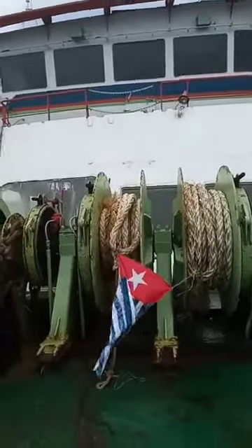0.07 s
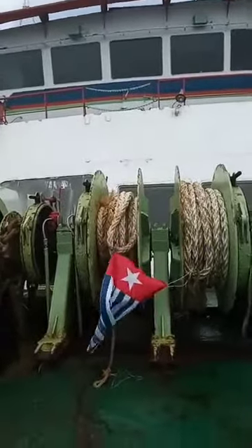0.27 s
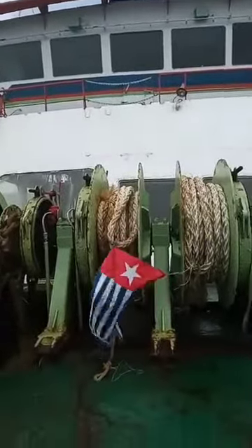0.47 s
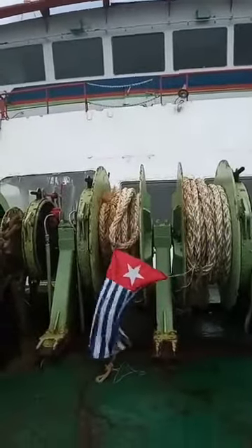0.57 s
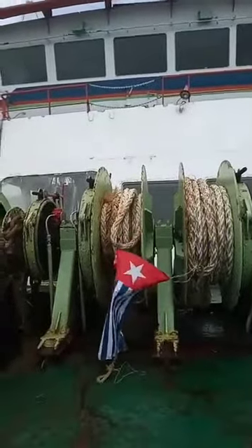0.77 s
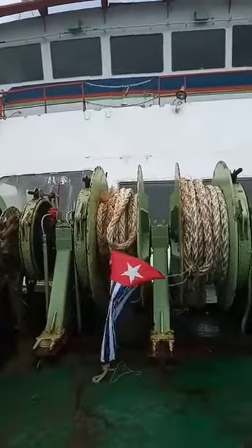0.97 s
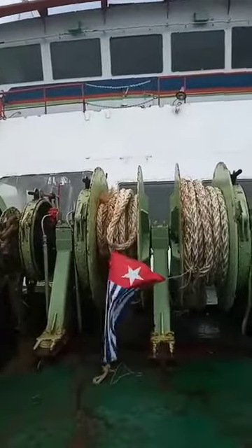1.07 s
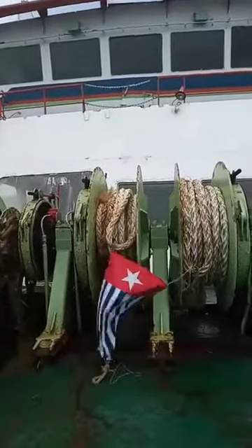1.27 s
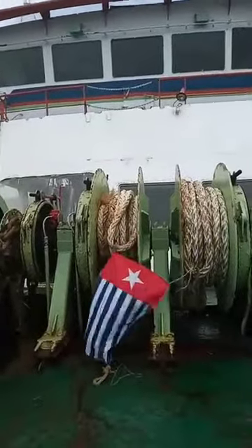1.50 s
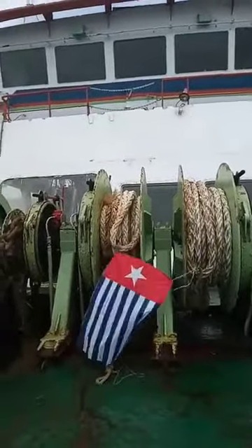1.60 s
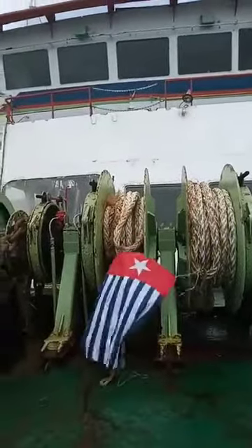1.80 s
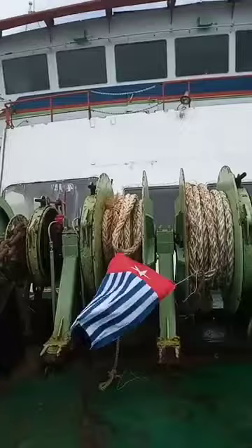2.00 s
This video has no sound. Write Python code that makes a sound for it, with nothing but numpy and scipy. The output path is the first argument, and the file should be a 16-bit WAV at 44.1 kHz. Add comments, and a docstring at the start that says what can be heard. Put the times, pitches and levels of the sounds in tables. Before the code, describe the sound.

Strong wind batters a small microphone on an open ship deck, with rapid roaring gusts, low thumps, hiss and crackling pops, softly distorted throughout; a faint steady ship rumble lies beneath and a flag snaps occasionally.

```python
"""Strong wind on an open ship deck tears across a small microphone port.
From the start, gusts of coloured noise hiss, roar and howl at a wandering pitch, with sharp pressure pops;
slow eddies thump as resonated noise, over a steady low rumble of the ship and a faint flickering top.
Brief tonal puffs soon join, and from 0.78 s a flag snaps now and then in bursts of bright noise.
The microphone overloads softly throughout, by a saturating curve."""
import sys
import numpy as np
from scipy import signal
from scipy.io import wavfile
from scipy.ndimage import uniform_filter1d

SR = 44100
rng = np.random.default_rng(int(sys.argv[2]) if len(sys.argv) > 2 else 0)


def unload_audio(sound):
    """Save the sound as a 16-bit wav file, at the path given as the first command line argument."""
    columns = np.transpose(np.atleast_2d(sound))
    # keep every value between -1 and 1, then stretch to whole-number steps
    steps = np.round(np.clip(columns, -1, 1) * 32767)
    wavfile.write(sys.argv[1], SR, steps.astype(np.int16))


N = 90404

# Gusts on the port. Each row: time in seconds, level of the lower hiss in dB,
# level of the upper hiss in dB, level of the roar in dB.
GUSTS = [(0.0, -39, -40, -12), (0.01, -59, -67, -41.5), (0.02, -32, -50, -24.5), (0.06, -35.5, -40, -20.5),
         (0.12, -53, -64, -38.5), (0.18, -27.5, -40.5, -21.5), (0.19, -50.5, -62, -29),
         (0.22, -28, -33, -21), (0.27, -41, -62, -20), (0.29, -31, -28.5, -25.5), (0.31, -56.5, -63, -38.5),
         (0.35, -38, -45.5, -22.5), (0.39, -46.5, -61.5, -33.5), (0.44, -41, -49, -18),
         (0.46, -54.5, -67, -35), (0.48, -34.5, -43.5, -27.5), (0.54, -31, -37, -21.5),
         (0.56, -45, -53.5, -30), (0.63, -45, -52.5, -24), (0.64, -58, -67, -40), (0.67, -28.5, -27, -31),
         (0.69, -56, -64, -36.5), (0.72, -22, -28, -21.5), (0.76, -34.5, -44.5, -25.5),
         (0.78, -20, -25.5, -25), (0.79, -28, -34.5, -19.5), (0.86, -27, -31.5, -19),
         (0.88, -40, -47.5, -25.5), (0.91, -29, -38, -22.5), (1.01, -42.5, -50.5, -27),
         (1.04, -53.5, -63.5, -34), (1.11, -39.5, -42.5, -29.5), (1.24, -34, -41, -27),
         (1.25, -41.5, -55, -43.5), (1.28, -29.5, -35, -19.5), (1.31, -49, -64, -35),
         (1.34, -41.5, -49.5, -22.5), (1.37, -28.5, -37, -21.5), (1.42, -47, -52, -21.5),
         (1.43, -43, -40, -27.5), (1.46, -46.5, -64, -35.5), (1.48, -32, -31.5, -30),
         (1.5, -32, -38, -19.5), (1.53, -49, -63, -33), (1.56, -46.5, -48.5, -22.5),
         (1.63, -30.5, -51, -25), (1.64, -49.5, -61, -40.5), (1.68, -39.5, -50, -30),
         (1.69, -50, -47.5, -26.5), (1.74, -36.5, -46.5, -22), (1.81, -43.5, -54, -26.5),
         (1.84, -30.5, -37, -24.5), (1.85, -33, -42, -33.5), (1.89, -33.5, -33.5, -27.5),
         (1.92, -44.5, -54, -34.5), (1.94, -27, -40.5, -23), (1.96, -27, -34, -16),
         (1.98, -53.5, -55.5, -30), (2.03, -33.5, -46, -24), (2.05, -47, -71, -34)]
# Wandering pitch of the howl. Each row: time in seconds, centre frequency in Hz.
HOWL_PITCH = [(0.0, 1226), (0.1, 1240), (0.14, 740), (0.24, 880), (0.3, 1240), (0.46, 1364), (0.53, 706),
              (0.66, 816), (0.87, 694), (0.92, 955), (1.04, 710), (1.26, 804), (1.38, 684), (1.44, 950),
              (1.5, 556), (1.6, 666), (1.68, 1255), (1.74, 1252), (1.78, 794), (1.9, 520), (2.0, 693),
              (2.05, 1360)]
# Large eddies. Each row: time in seconds, level of the thumps in dB, their centre frequency in Hz,
# level of the low roar in dB.
EDDIES = [(0.0, -28, 142.5, -27), (0.12, -25.5, 235, -25), (0.16, -27.5, 269, -25), (0.31, -22, 123.5, -33),
          (0.35, -17, 144.6, -26.5), (0.47, -26.5, 171, -26.5), (0.51, -17, 205, -24.5),
          (0.58, -16.5, 243.6, -23.5), (0.63, -28, 150, -27), (0.65, -16, 206, -38), (0.75, -34, 172, -19),
          (0.78, -33, 119.7, -24), (0.82, -27, 205, -14), (0.85, -14.5, 234.6, -18.5),
          (0.89, -25, 151.6, -21.5), (0.95, -20, 149.4, -18.5), (1.02, -16.5, 190.4, -42),
          (1.06, -28.5, 183, -21), (1.12, -15.5, 148, -28), (1.32, -24, 150.4, -23.5),
          (1.36, -20, 225, -27.5), (1.39, -20, 249, -20), (1.42, -31, 104.6, -27),
          (1.45, -16.5, 116.6, -30), (1.5, -23.5, 161, -25), (1.54, -24, 100.6, -24),
          (1.6, -18.5, 202, -22.5), (1.64, -17, 204, -33.5), (1.65, -22, 185, -24), (1.69, -17, 134, -28),
          (1.8, -28.5, 118.4, -24), (1.85, -19, 180, -28), (1.88, -37, 177, -15.5), (1.91, -24, 118, -23.5),
          (1.96, -18.5, 213, -30), (2.05, -20, 216, -21)]
# Level of the faint top. Each row: time in seconds, level in dB before flicker.
AIR_LEVEL = [(0.0, -69), (0.02, -66), (0.03, -54.5), (0.06, -75), (0.22, -73), (0.28, -87), (0.29, -67),
             (0.46, -88), (0.51, -60.5), (0.53, -85), (0.66, -87), (0.66, -65), (0.7, -80), (0.72, -62),
             (0.77, -86), (0.77, -64), (0.87, -56), (0.88, -76.5), (1.44, -71.5), (1.8, -83), (1.84, -70.5),
             (2.0, -79)]
# Short tonal puffs, from deep thuds to whistles. Each row: centre in seconds, peak level in dB,
# pitch in Hz, length in seconds between the points where the swell has fallen to exp(-2).
PUFFS = [(0.055, -23, 1648, .02), (0.157, -21.5, 702, 0.05), (0.165, -23, 1274, 0.044),
         (0.2, -19.5, 1250, 0.0087), (0.358, -24, 1200, 0.02), (0.451, -19, 1340, 0.0054),
         (0.467, -21, 425, 0.1), (0.59, -19.5, 804, 0.0068), (1.261, -23, 1135, 0.014),
         (1.342, -23.5, 1716, 0.031), (1.692, -40, 1300, .012), (1.806, -24, 765, 0.046),
         (1.95, -25.5, 1920, 0.022), (2.012, -22, 1277, 0.0091), (0.03, -18.5, 696, 0.012),
         (0.142, -22, 325, 0.036), (0.055, -23, 79, 0.047), (0.305, -18.5, 102, 0.059),
         (0.705, -25, 77, 0.056), (0.788, -19, 93, 0.043), (0.952, -18, 94.6, .07),
         (1.269, -20, 85.6, 0.035), (1.43, -22, 94.2, 0.076), (1.552, -19.5, 74.5, 0.057),
         (1.715, -24.5, 106, 0.045), (1.909, -23, 78, .05)]
# Snaps of the flag's cloth. Each row: centre in seconds, peak level in dB.
SNAPS = [(0.777, -22), (0.834, -32), (1.113, -28), (1.63, -26), (1.947, -30.5)]

# Spectral shapes of the noises. Each row: frequency in Hz, relative density in dB per Hz.
HISS_SPECTRUM = [(1290, -33), (2200, -7.5), (4900, -19.5), (6370, -29), (10800, -120)]
UPPER_HISS_SPECTRUM = [(2760, -61), (4700, -5.5), (6300, -1.5), (7100, -0.5), (7400, -3), (8130, -17.5),
                       (10600, -29), (17900, -120)]
ROAR_SPECTRUM = [(380, -23.5), (650, -2.5), (970, -6.5), (1270, -5.5), (1680, -7.5), (2600, -28.5),
                 (3380, -33.5), (5720, -120)]
THUMP_SPECTRUM = [(15, -49), (25, -45), (98, 2.5), (227, -3.5), (300, -3.5), (390, -24.5), (660, -120)]
LOW_ROAR_SPECTRUM = [(150, -23), (260, 0.5), (290, -0.5), (508, -2.5), (750, -14.5), (980, -37),
                     (1650, -120)]
RUMBLE_SPECTRUM = [(30, -28.5), (60, 4), (100, 19.5), (200, -13.5), (500, -18), (2000, -49), (8000, -65.5),
                   (8400, -97.5)]
AIR_SPECTRUM = [(8000, -25.5), (8400, 3), (10000, -3.5), (14800, -6.5), (15700, -24), (16500, -60.5)]

RUMBLE_DB = -35.5
HOWL_DB, HOWL_WIDTH_HZ = -5.5, 97  # level against the plain roar; width of each smoothing
EDDY_DB, EDDY_WIDTH_HZ = 0, 40.5  # level of the swing against the plain thump noise
# dB of level per unit of flicker
HISS_FLICKER_DB, ROAR_FLICKER_DB, LOW_FLICKER_DB, THUMP_FLICKER_DB, AIR_FLICKER_DB = 4.5, 4, 1, 2.04, 4.1
FLICKER_S = 0.0015
# depth of the wide patches, before the limit on lumps
HISS_PATCH_DB, ROAR_PATCH_DB, LOW_PATCH_DB = 0, 5.5, 2.5
SPECK_DB, SPECK_S, SPECK_HZ = 4, 0.0054, 39.4  # narrow, short, whistly specks
LUMP_LIMIT_DB = 7  # patches and specks never stand out more than this
STEADINESS = 0.56  # how far a noise holds its strength instead of wandering (0-1)
POPS_PER_S, POP_DB, POP_SPREAD_DB, POP_S = 200, -9.5, 6, 0.00011  # POP_DB is against the roar
PUFF_WIDTH_HZ = 51  # at 1 kHz, narrower for deeper puffs
SNAP_S, SNAP_LOW_HZ = 0.0013, 1500
CEILING = 0.7  # amplitude at which the overload saturates
BAND_HZ, EDGE_HZ = 8020, 15800  # cut-off of the wind; final cut-off


def gain_of(db):
    """Level principle: 20 dB is a tenfold amplitude."""
    return 10 ** (np.asarray(db) / 20)


def evened(x):
    """Power normalisation: scales a signal to unit root-mean-square."""
    return x / np.sqrt(np.mean(x ** 2) + 1e-20)


def curves(table):
    """Linear interpolation: joins each column of a table by straight lines in time."""
    rows = np.transpose(table)
    return [np.interp(np.arange(N) / SR, rows[0], column) for column in rows[1:]]


def bell(width):
    """Gaussian smoothing: a bell with a standard deviation of width samples."""
    steps = np.arange(-int(3 * width) - 1, int(3 * width) + 2)
    return np.exp(-0.5 * (steps / width) ** 2)


def patchwork(frames, size, patch_s, patch_hz):
    """Correlated randomness: white noise smoothed into hills over frequency and time."""
    hill = np.outer(bell(patch_hz * size / SR), bell(patch_s * SR * 4 / size))
    grid = rng.standard_normal((frames, size // 2 + 1)).T
    return evened(signal.fftconvolve(grid, hill, "same"))


def noise(spectrum, patch_db, size, patch_s, patch_hz, speck_db=SPECK_DB):
    """Spectral shaping: random Fourier frames coloured, with drifting wide patches and narrow specks."""
    hop = size // 4
    frames, hz = N // hop + 5, np.fft.rfftfreq(size, 1 / SR)
    real, imaginary = rng.standard_normal((frames, len(hz), 2)).T
    patches_db = patch_db * patchwork(frames, size, patch_s, patch_hz)
    specks_db = speck_db * patchwork(frames, size, SPECK_S, SPECK_HZ)
    lumps_db = LUMP_LIMIT_DB * np.tanh((patches_db + specks_db) / LUMP_LIMIT_DB)
    f, db = np.transpose(spectrum)
    # straight lines over log frequency
    colour_db = np.interp(np.log(hz + 1), np.log(f + 1), db, left=-120, right=-120)[:, None]
    bins = (real + 1j * imaginary) * gain_of(colour_db + lumps_db)
    return evened(signal.istft(bins, nperseg=size, noverlap=size - hop)[1][:N])


def resonate(x, hz, width_hz):
    """Moving resonance by heterodyning: shift down to zero, smooth twice, shift back."""
    turn = np.exp(2j * np.pi * np.cumsum(hz) / SR)
    pole = np.exp(-np.pi * width_hz / SR)
    smoothed = signal.lfilter([1], np.convolve([1, -pole], [1, -pole]), x / turn)
    return evened((turn * smoothed).real)


def blend(plain, tone, tone_db):
    """Superposition: adds a tone at a level relative to the plain noise."""
    return evened(plain + gain_of(tone_db) * tone)


def steadied(x, smooth_s):
    """Envelope compression: dividing by a power of the local power evens out chance swells."""
    power = signal.fftconvolve(x ** 2, bell(smooth_s * SR), "same")
    relative_power = abs(power) / np.mean(power)
    return evened(x / (relative_power + 0.023) ** (STEADINESS / 2))


def quick_flicker():
    """Band-limited modulation: smoothed noise less its slow part, softly bounded."""
    flicker = evened(signal.fftconvolve(rng.standard_normal(N), bell(FLICKER_S * SR), "same"))
    slow = signal.fftconvolve(flicker, bell(0.0087 * SR), "same") / bell(0.014 * SR).sum()
    flicker = evened(flicker - 0.33 * slow)
    return 2.04 * np.tanh(flicker / 1.9)


def gusts(flicker):
    """Turbulence noise: air tearing over the port hisses and roars, with a fuzzy resonant howl."""
    hiss_db, upper_db, roar_db = curves(GUSTS)
    hiss = noise(HISS_SPECTRUM, HISS_PATCH_DB, size=1024, patch_s=0.033, patch_hz=400)
    upper = noise(UPPER_HISS_SPECTRUM, HISS_PATCH_DB, size=1024, patch_s=0.016, patch_hz=400)
    both_hisses = gain_of(hiss_db) * hiss + gain_of(upper_db) * upper

    howl = resonate(rng.standard_normal(N), curves(HOWL_PITCH)[0], HOWL_WIDTH_HZ)
    plain_roar = noise(ROAR_SPECTRUM, ROAR_PATCH_DB, size=1024, patch_s=0.015, patch_hz=211)
    roar = gain_of(roar_db) * steadied(blend(plain_roar, howl, HOWL_DB), 0.0064)

    hiss_flicker = evened(gain_of(HISS_FLICKER_DB * flicker))
    roar_flicker = evened(gain_of(ROAR_FLICKER_DB * flicker))
    return both_hisses * hiss_flicker + roar * roar_flicker


def eddies(flicker):
    """Large-scale turbulence: lumpy low pressure swings about a moving centre, with a low roar."""
    thump_db, centre_hz, low_db = curves(EDDIES)
    swing = steadied(resonate(rng.standard_normal(N), centre_hz, EDDY_WIDTH_HZ), 0.0096)
    plain_thump = noise(THUMP_SPECTRUM, LOW_PATCH_DB, size=2048, patch_s=0.0098, patch_hz=38.3, speck_db=-0.3)
    thump = steadied(blend(plain_thump, swing, EDDY_DB), 0.017)
    low_roar = noise(LOW_ROAR_SPECTRUM, LOW_PATCH_DB, size=1024, patch_s=0.03, patch_hz=74, speck_db=5.0)
    thump_gain = gain_of(thump_db + THUMP_FLICKER_DB * flicker)
    low_gain = gain_of(low_db + LOW_FLICKER_DB * flicker)
    return thump_gain * thump + low_gain * low_roar


def ship():
    """Stationary noise: a low rumble at a constant level."""
    return gain_of(RUMBLE_DB) * noise(RUMBLE_SPECTRUM, 1.2, size=2048, patch_s=0.015, patch_hz=60)


def air(flicker):
    """Amplitude modulation: a faint thin top that shares the flicker of the gusts."""
    top = noise(AIR_SPECTRUM, 8.4, size=512, patch_s=0.012, patch_hz=1200)
    return gain_of(curves(AIR_LEVEL)[0] + AIR_FLICKER_DB * flicker) * top


def pops():
    """Random impulse train: short pressure spikes of either sign as small eddies burst on the port."""
    chance, size, sign = rng.random((N, 3)).T
    strength = gain_of(-POP_SPREAD_DB * np.log(size + 0.026))  # a few stand far above the rest
    train = (chance < POPS_PER_S / SR) * np.sign(sign - 0.5) * strength
    spikes = signal.oaconvolve(train, bell(POP_S * SR), "same")
    sharp = evened(spikes - uniform_filter1d(spikes, size=90))  # less their local mean
    roar_db = curves(GUSTS)[2]
    return gain_of(roar_db + POP_DB) * sharp


def puffs():
    """Narrow-band resonance: each puff is a brief fuzzy tone under a Gaussian swell."""
    t, out = np.arange(N) / SR, np.zeros(N)
    for centre_s, db, hz, length_s in PUFFS:
        width_hz = PUFF_WIDTH_HZ * np.sqrt(hz / 1e3)
        tone = steadied(resonate(rng.standard_normal(N), np.full(N, hz), width_hz), 0.015)
        swell = np.exp(-2 * ((t - centre_s) * 2 / length_s) ** 2)
        puff = tone * swell
        # the same energy whatever the random draw
        out += gain_of(db) * puff * np.linalg.norm(swell) / np.linalg.norm(puff)
    return out


def flag():
    """Transient noise: snapping cloth gives crisp high-passed bursts a few milliseconds long."""
    t = np.arange(N) / SR
    high_pass = signal.butter(2, SNAP_LOW_HZ, "high", fs=SR)
    bright = evened(signal.lfilter(*high_pass, rng.standard_normal(N)))
    return bright * sum(gain_of(db) * np.exp(-0.5 * ((t - s) / SNAP_S) ** 2) for s, db in SNAPS)


def scene():
    """Superposition and saturation: the sources add, overload softly and lose their treble under the air."""
    flicker = quick_flicker()
    pressure = gusts(flicker) + eddies(flicker) + ship() + pops() + puffs() + flag()
    overloaded = CEILING * np.tanh(pressure / CEILING)
    low_pass = signal.firwin(255, BAND_HZ, window=("kaiser", 7), fs=SR)
    wind = signal.oaconvolve(overloaded, low_pass, "same")
    return (wind + air(flicker))[None]


def record(dry):
    """Band limitation: a linear-phase low-pass makes the final cut-off."""
    low_pass = signal.firwin(511, EDGE_HZ, window=("kaiser", 9), fs=SR)
    return signal.oaconvolve(dry, low_pass[None], "same")


dry = scene()
out = record(dry)
unload_audio(out)
```